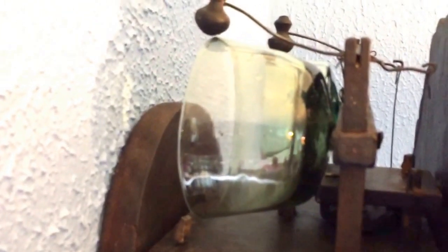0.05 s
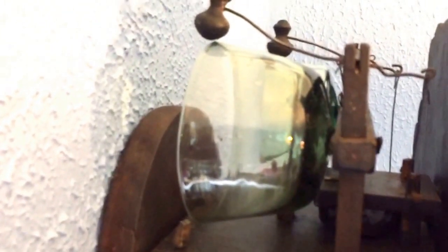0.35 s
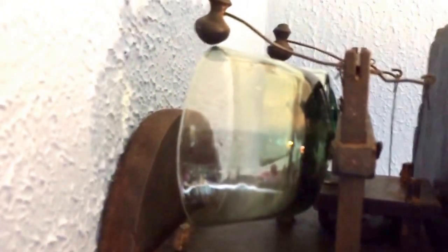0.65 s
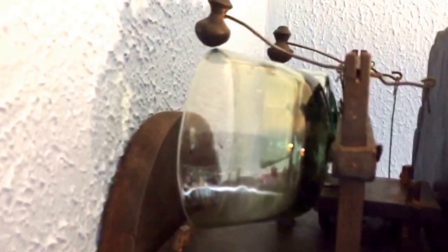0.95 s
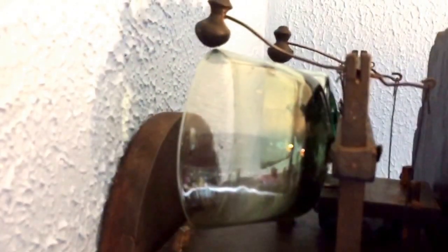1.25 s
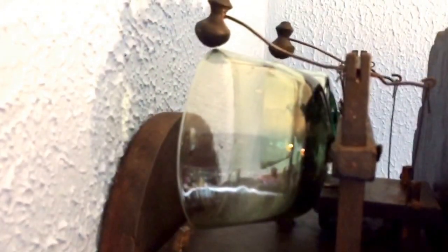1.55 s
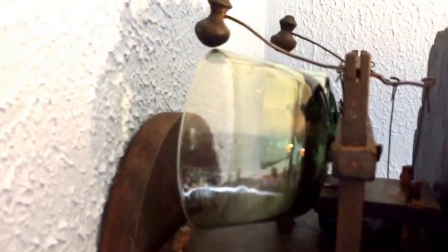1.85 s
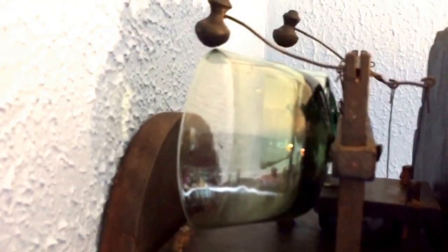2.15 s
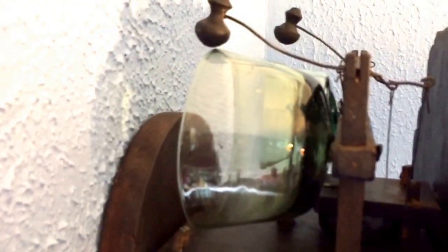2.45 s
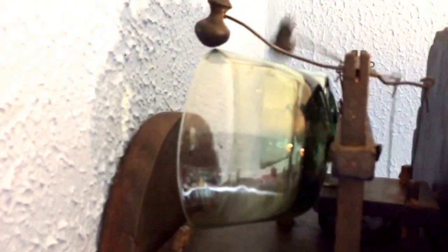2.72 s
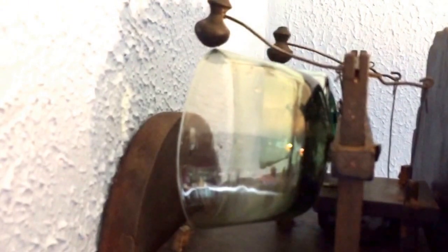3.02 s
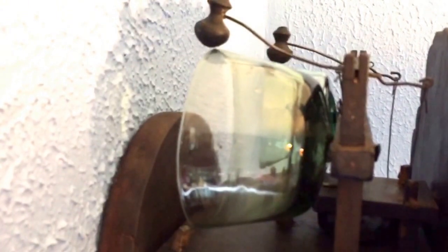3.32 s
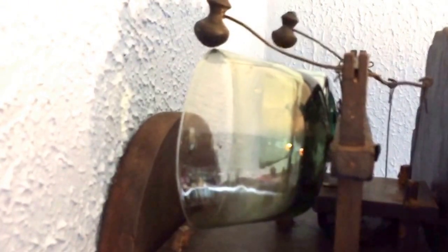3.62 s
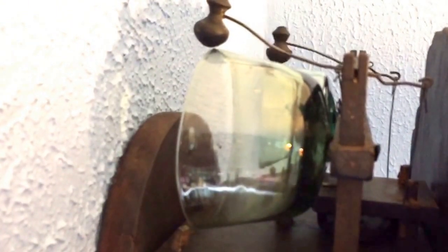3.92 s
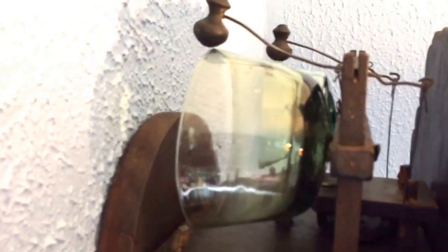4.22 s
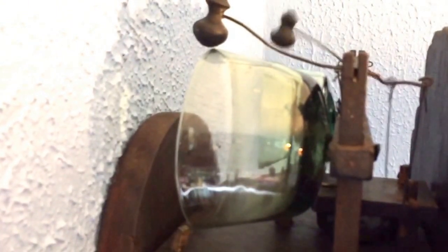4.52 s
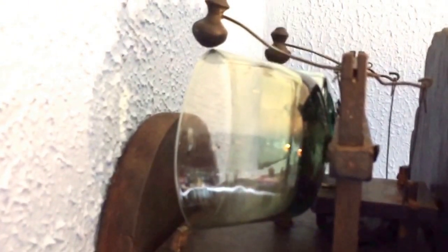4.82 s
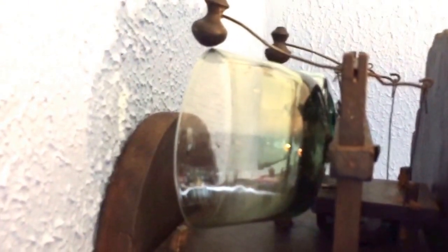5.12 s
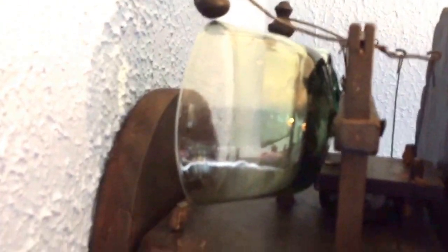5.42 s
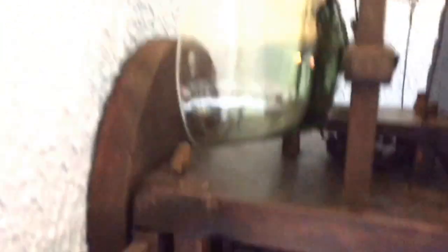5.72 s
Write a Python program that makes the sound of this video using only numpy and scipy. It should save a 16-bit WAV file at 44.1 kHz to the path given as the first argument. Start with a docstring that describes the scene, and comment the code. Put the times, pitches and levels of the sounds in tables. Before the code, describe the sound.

An antique clock's levers click and its gears rattle, then a hammer strikes a glass bell three times, each tone ringing on.

```python
"""Antique clock striking a glass bell

A small room, microphone close to a weight-driven clock. Levers click and release the striking train,
whose gears rattle in the wooden frame while the hammer falls three times on a hand-blown glass bell.
The glass is slightly out of round, so each mode is a close pair that beats; a faint ring lingers from
an earlier blow. At the end the microphone swings away from the glass with a low handling rustle."""
import sys
import numpy as np
from scipy import signal
from scipy.fft import rfft, irfft
from scipy.io import wavfile
from scipy.ndimage import uniform_filter1d

SR = 44100
rng = np.random.default_rng(int(sys.argv[2]) if len(sys.argv) > 2 else 0)


def transcribe(u):
    """Save the signal u as a 16-bit wav file named by the first command-line argument.

    u: samples, shape (n,) or (channels, n), limited to [-1, 1]; the rate is SR.
    q: integer samples, one column per channel.
    """
    v = np.clip(np.atleast_2d(u).T, -1, 1)
    q = np.round(v * 32767).astype(np.int16)
    wavfile.write(sys.argv[1], SR, q)


N = 258623
T = np.arange(N) / SR

# hammer blows: t/s, strength/dB, extra level of the twin modes/dB, factor on the ring time
HAMMER_BLOWS = [(2.8709, 0, .5, .93), (3.9694, -.2, -.5, 1.03), (4.6886, -.3, -1, .9)]
# gear train speeding up, running and slowing down: t/s, rattle/dB, treble scrape/dB
GEAR_RUN = [(1.3, -79, -89), (1.43, -70, -91), (1.67, -88, -96), (1.81, -56, -75), (2.33, -48.5, -71),
            (2.49, -41.5, -58), (2.59, -48, -66), (3.17, -47.5, -59), (3.33, -41.5, -53),
            (3.79, -37.5, -50), (4.08, -42.5, -48.5), (4.51, -36.5, -44), (4.75, -41.5, -47.5),
            (5.12, -37.5, -46), (5.43, -41, -58), (5.58, -41, -72), (5.73, -49, -80), (5.86, -58, -80)]
# levers dropping and bouncing, and one hard pin tick at the end: t/s, clack/dB, tick/dB, ring/dB, centre of the
# ring/Hz
LEVER_DROPS = [(0.317, -60, -53, -35, 4280), (0.325, -53, -49, -40.5, 1840), (0.326, -66, -48, -34, 4270),
               (0.327, -59, -62, -46, 518), (0.817, -70, -86, -48, 1450), (1.201, -69, -72, -44.5, 1830),
               (1.255, -38.5, -45, -40.5, 1880), (1.269, -47, -55, -44, 1090), (1.646, -37, -56, -39, 2800),
               (2.183, -26, -30.5, -14, 2750), (2.192, -26, -28.5, -28, 820), (2.337, -40, -41, -24, 1350),
               (2.353, -33, -45, -25.5, 1850), (2.447, -23.5, -34, -10, 5600),
               (2.461, -35.5, -37, -37, 1110), (2.471, -28, -22.5, -17, 1680), (2.484, -49, -52, -28, 1140),
               (4.942, -24, -28, -9.5, 9700), (5.005, -20, -17, -6.5, 1840), (5.016, -35, -35, -30, 365),
               (5.268, -41, -32, -17.5, 3840)]


def amp(db):
    """Decibels to gain."""
    return 10 ** (np.asarray(db) / 20)


def unit(x):
    """Scales to rms 1."""
    return x / np.sqrt(np.mean(x ** 2) + 1e-20)


def spectrum_db(points, hz):
    """Interpolates a spectrum on a log-frequency axis."""
    f, db = np.transpose(points)
    return np.interp(np.log(hz + 1), np.log(f + 1), db)


def add(mix, s, sound):
    """Mixes a sound in at s seconds."""
    part = mix[max(round(s * SR), 0):][:len(sound)]
    part += sound[:len(part)]


def mode(t, hz, db, t60):
    """A sine that dies by 60 dB in t60 seconds."""
    return amp(db - 60 * t / t60) * np.sin(2 * np.pi * hz * t)


def through_frame(x, lo_hz, hi_hz, size=8192):
    """Passes a force through one band of the frame's response: causal, with unit energy."""
    # broad colour of the clockwork: f/Hz, level/dB
    colour = [(30, -29.5), (60, -7.5), (110, -4.5), (260, -10), (520, -4), (630, -17.5), (830, 2.5),
              (1280, -5.5), (1650, 0), (2700, 2.5), (4500, -1.5), (5500, -6.5), (8000, -14.5),
              (16000, -20.5)]
    # resonances of the frame and its ironwork: f/Hz, width/Hz, lift/dB
    resonances = [(119, 25, 4), (190, 30, 4), (364, 50, 4), (495, 80, 3), (792, 60, 6), (1075, 120, 5),
                  (1690, 130, 4), (1950, 150, 4), (2570, 140, 5), (2900, 150, 3), (4230, 250, 4),
                  (4650, 200, 3), (7400, 300, 3), (8500, 250, 3), (9300, 300, 4), (11450, 700, 6),
                  (14500, 800, 3)]
    hz = abs(np.fft.fftfreq(size, 1 / SR)) + 1
    peaks_db = sum(lift / (1 + (2 * (hz - f) / width) ** 2) for f, width, lift in resonances)
    roll_off = np.sqrt((1 + (lo_hz / hz) ** 8) * (1 + (hz / hi_hz) ** 16))
    gain = amp(spectrum_db(colour, hz) + peaks_db) / roll_off
    log_gain = np.log(np.maximum(gain, 1e-5))
    minimum_phase = np.exp(np.conj(signal.hilbert(log_gain)))
    taps = np.fft.ifft(minimum_phase).real[:size // 2]
    return signal.oaconvolve(x, taps / np.linalg.norm(taps))[:N]


def bursts(times, levels_db, rise_s, t60):
    """Each contact swells as the parts seat, then scatters into quickly dying reflections."""
    power, t = np.zeros(N), T[:SR // 3]
    swell = np.minimum(t / rise_s, 1)
    fall_db = 60 * np.maximum(t - rise_s, 0) / t60
    for s, db in zip(times, levels_db):
        add(power, s, (swell * amp(db - fall_db)) ** 2)
    return np.sqrt(power) * rng.standard_normal(N)


def chatter(per_s, spread_db, t60):
    """Parts catching unevenly: many small bursts of random size, steady on average."""
    sizes = amp(spread_db * np.minimum(rng.exponential(1, N), 3))
    catches = sizes * (rng.random(N) < per_s / SR)
    power = signal.lfilter([1], [1, -amp(-120 / (t60 * SR))], catches ** 2)
    local_mean = abs(uniform_filter1d(power, size=6000)) + 1e-9
    return np.sqrt(power / local_mean) * rng.standard_normal(N)


def click(s, clack_db, tick_db, rise_s, clack_t60, tick_t60):
    """Iron on iron: a clack through the frame and a short bright tick."""
    clack = through_frame(bursts(s, clack_db, rise_s, clack_t60), 640, 4900)
    return clack + through_frame(bursts(s, tick_db, rise_s, tick_t60), 4800, 26000)


def room_tone(level_db=-64.5):
    """Low steady noise of the room."""
    # spectrum of the room: f/Hz, relative level/dB
    colour = [(15, -40), (30, -4.5), (60, -0.5), (130, -1.5), (220, -20.5), (300, -8.5), (400, -21.5),
              (1200, -22), (3000, -30), (9000, -35), (16000, -47)]
    gain = amp(spectrum_db(colour, np.fft.rfftfreq(N, 1 / SR)))
    return amp(level_db) * unit(irfft(rfft(rng.standard_normal(N)) * gain, N))


def walls(x, wet_db=-16, t60=0.17, dull_hz=4000, delay_s=0.004):
    """Adds a short, dull tail from the plaster walls."""
    t = T[:SR // 2]
    tail = rng.standard_normal(len(t)) * amp(-60 * t / t60) * (t > delay_s)
    tail = signal.sosfilt(signal.butter(1, dull_hz, fs=SR, output="sos"), tail)
    return x + amp(wet_db) * signal.oaconvolve(x, tail / np.linalg.norm(tail))[:N]


def handling(start_s=4.95, rise_s=0.077, level_db=-52.5, band_hz=(45, 550)):
    """A low rustle as the hand starts to move the microphone and keeps it moving."""
    band = signal.butter(3, band_hz, "bandpass", fs=SR, output="sos")
    rustle = unit(signal.sosfilt(band, rng.standard_normal(N)))
    return amp(level_db) * np.clip((T - start_s) / rise_s, 0, 1) * rustle


def bumps(rise_s=0.0077, side_ratios=(0.55, 1.1), side_db=-8):
    """A soft push wakes three well-damped low modes."""
    # dull bumps from the case and from handling: t/s, f/Hz, level/dB, t60/s
    pushes = [(0.225, 102, -52, 0.53), (0.333, 162, -52, 0.56), (0.701, 335, -33.5, 0.037),
              (0.986, 277, -52, 0.052), (1.136, 324, -39, 0.033), (1.215, 380, -47.5, 0.068),
              (5.673, 84, -35.5, 0.099)]
    out, t = np.zeros(N), T[:SR // 4]
    for s, hz, db, t60 in pushes:
        body = mode(t, hz, 0, t60) + sum(mode(t, hz * ratio, side_db, t60) for ratio in side_ratios)
        add(out, s, amp(db) * np.minimum(t / rise_s, 1) * body)
    return out


def gears(full_run_db=-40, rumble_db=-50.5, rumble_follows=0.51, rattle_db=1, scrape_db=4, whirr_db=-10):
    """Catching teeth and a smooth whirr shake the frame; the dry pivots add a grainy scrape."""
    s, *columns = np.transpose(GEAR_RUN)
    run_db, friction_db = (np.interp(T, s, db, left=-120) for db in columns)
    drive_db = run_db - full_run_db
    speed = np.minimum(amp(drive_db), 1)
    teeth = chatter(per_s=70 + 100 * speed, spread_db=1.0, t60=0.024)
    whirr = rng.standard_normal(N)
    pivots = chatter(per_s=190, spread_db=4.5, t60=0.03)
    rumble = through_frame(amp(rumble_db + rumble_follows * drive_db) * unit(teeth + whirr), 68, 750)
    rattle = through_frame(amp(run_db + rattle_db) * (teeth + amp(whirr_db) * whirr), 838, 5200)
    scrape = through_frame(amp(friction_db + scrape_db) * pivots, 4390, 24000)
    return rumble + rattle + scrape


def wheel_clinks(per_mode_per_s=14, lift_db=0.5, spread_db=3.5, ring_cycles=90, detune=0.035):
    """Stray teeth catch hard and ring a wheel, louder as the train runs harder."""
    # modes of the wheels: f/Hz, relative level/dB
    wheel_modes = [(1950, -12), (2570, 1), (2900, 6), (4090, -1), (4500, 1.5), (7400, -9), (11450, -16)]
    s, rattle_db, _ = np.transpose(GEAR_RUN)
    out = np.zeros(N)
    for hz, db in wheel_modes:
        for when, softness, pitch in rng.random((round(per_mode_per_s * T[-1]), 3)):
            start_s = when * T[-1]
            clink_hz = hz * (1 + detune * (2 * pitch - 1))
            run_db = np.interp(start_s, s, rattle_db, left=-120)
            peak_db = run_db + lift_db + db - spread_db * np.log(softness + 0.046)
            add(out, start_s, mode(T[:SR // 10], clink_hz, peak_db, ring_cycles / clink_hz))
    return out


def ratchet(clack_db=-3, tick_db=-16, thump_db=-17):
    """The pawl slips over the ratchet in light, dry clicks, all of one colour."""
    # slips as the train starts: t/s, level/dB
    slips = [(1.394, -35), (1.4356, -35.5), (1.479, -36.5), (1.5346, -37.5), (1.5808, -47), (1.6203, -48),
             (1.6628, -27), (1.6863, -32), (1.719, -35.5), (1.7504, -35.5), (1.775, -43), (1.8023, -40.5),
             (1.831, -36), (1.8833, -41), (1.9056, -38.5), (1.9781, -34.5), (2.0165, -35.5),
             (2.0385, -36.5), (2.0995, -32.5), (2.253, -31.5), (2.4104, -32.5)]
    s, db = np.transpose(slips)
    thump = through_frame(bursts(s, db + thump_db, rise_s=0.002, t60=0.15), 170, 1110)
    return thump + click(s, db + clack_db, db + tick_db, rise_s=0.002, clack_t60=0.04, tick_t60=0.038)


def pins(clack_db=-10, clack_follows=0.54, tick_db=3):
    """Pins of the running train tick against the hammer tail; the harder, the brighter."""
    # pins catching: t/s, level/dB
    catches = [(2.7014, -46.5), (2.721, -45), (2.8086, -42), (3.1397, -46.5), (3.1834, -38), (3.4535, -40),
               (3.6322, -34), (3.6484, -36), (4.2802, -31), (4.2988, -32), (5.1104, -30), (5.394, -31),
               (5.4573, -43.5), (5.5706, -35)]
    s, db = np.transpose(catches)
    return click(s, clack_db + clack_follows * db, db + tick_db,
                 rise_s=0.00033, clack_t60=0.042, tick_t60=0.028)


def levers(clack_db=1.5, tick_db=2.5, thump_db=-21, thump_follows=0.72, boom_db=-7):
    """A falling lever clicks and thumps the frame, which booms on; harder drops thump more."""
    s, clack, tick, _, _ = np.transpose(LEVER_DROPS)
    push_db = thump_db + thump_follows * clack
    thump = bursts(s, push_db, rise_s=0.00067, t60=0.21)
    boom = bursts(s, push_db + boom_db, rise_s=0.0047, t60=0.37)
    clicks = click(s, clack + clack_db, tick + tick_db, rise_s=0.0027, clack_t60=0.06, tick_t60=0.027)
    return through_frame(thump + boom, 59, 784) + clicks


def lever_rings(ring_cycles=79, fall_db_per_octave=22, rise_s=0.0017):
    """Each drop rings the iron's modes, most of all those near one pitch set by where it lands."""
    # modes of the lever iron: f/Hz, relative level/dB
    iron_modes = [(365, -1), (518, -5), (795, -4.5), (1090, 2), (1250, -3.5), (1696, 0.5), (1930, 2),
                  (2570, -3.5), (2900, -7), (4280, 3.5), (5520, 2.5), (9700, -3.5)]
    out, t = np.zeros(N), T[:SR // 3]
    for s, _, _, ring_db, centre_hz in LEVER_DROPS:
        ring = sum(mode(t, hz, db - fall_db_per_octave * abs(np.log2(hz / centre_hz)), ring_cycles / hz)
                   for hz, db in iron_modes)
        add(out, s, amp(ring_db) * np.minimum(t / rise_s, 1) * ring)
    return out


def hammer(thump_db=-29, crack_db=-24.5, tick_db=-22, rise_s=0.00011):
    """The blow cracks on the glass and jolts the frame."""
    s, strength_db, _, _ = np.transpose(HAMMER_BLOWS)
    thump = through_frame(bursts(s, strength_db + thump_db, rise_s, t60=0.015), 90, 680)
    crack = through_frame(bursts(s, strength_db + crack_db, rise_s, t60=0.032), 580, 6980)
    tick = through_frame(bursts(s, strength_db + tick_db, rise_s, t60=0.037), 5000, 18000)
    return thump + crack + tick


def glass_bell(lingering_db=-62.5, lingering_t60=3.3):
    """Over a faint lingering ring, each blow stops the last and starts the beating pairs afresh."""
    # mode pairs of the glass: f/Hz, twin f/Hz
    pitches = [(1373.1, 1363.3), (3207.4, 3182), (5831.5, 5827.6), (9180, 9168), (13180, 13172),
               (14850, 14820), (15590, 15560)]
    # ring of each pair: level/dB, t60/s, relative twin/dB, twin t60/s, relative attack/dB, attack t60/s
    decays = [(-36.5, 20.2, -3.5, 9.6, -4, 0.66), (-16.5, 1.902, -19.5, 1.95, -6, 0.34),
              (-18, 0.33, 1, 0.33, -9.5, 0.017), (-16.5, 0.12, -6.5, 0.14, -17, 0.015),
              (-33, 0.15, -7, .15, -19.5, 0.022), (-44, 0.068, -8.5, .09, -15.5, .02),
              (-51, .09, -7.5, .09, -11, 0.018)]
    # hammer wire and frame, ringing briefly at each blow: f/Hz, level/dB, t60/s
    clang_modes = [(4070, -38.5, .05), (6740, -37, 0.07), (9620, -47.5, .08), (11700, -42, 0.054),
                   (12240, -41, 0.04)]
    out = mode(T, pitches[0][0], lingering_db, lingering_t60)
    ends = [blow[0] for blow in HAMMER_BLOWS[1:]] + [T[-1] + 1]
    for (s, strength_db, lean_db, sustain), end in zip(HAMMER_BLOWS, ends):
        t = T[:round((end - s) * SR)]
        ring = sum(mode(t, hz, db, t60) for hz, db, t60 in clang_modes)
        for (hz, twin_hz), (db, t60, twin_db, twin_t60, attack_db, attack_t60) in zip(pitches, decays):
            # where the hammer lands sets the twin's share, and so the depth of the beat
            twin = mode(t, twin_hz, twin_db + lean_db, twin_t60 * sustain)
            pair = mode(t, hz, 0, t60 * sustain) + twin
            # the first wide swing dies faster than the rest
            ring += amp(db) * pair * (1 + amp(attack_db - 60 * t / attack_t60))
        onset = np.clip(t / 0.0004, 0, 1)
        stop = np.clip((t[-1] - t) / 0.001, 0, 1)
        add(out, s, amp(strength_db) * onset * stop * ring)
    return out


def scene():
    """Mono, close up: bell and lever rings dry, the clockwork with a little of the walls."""
    # the microphone swings away from the glass at the end: t/s, bell gain/dB
    swing = [(5.0, 5), (5.45, 5.5), (5.86, 1.5)]
    nearness = amp(np.interp(T, *np.transpose(swing)))
    works = hammer() + levers() + ratchet() + pins() + gears() + wheel_clinks() + bumps()
    return (nearness * glass_bell() + lever_rings() + walls(works) + handling() + room_tone())[None]


def record(dry, low_cut_hz=42, high_cut_hz=16000, knee=0.66, ceiling=0.672):
    """A small microphone loses the deep bass, rounds off the loudest peaks and cuts the top treble."""
    x = signal.sosfilt(signal.butter(2, low_cut_hz, "highpass", fs=SR, output="sos"), dry)
    headroom = ceiling - knee
    excess = np.maximum(abs(x) - knee, 0)
    rounded = np.clip(x, -knee, knee) + np.sign(x) * headroom * np.tanh(excess / headroom)
    lowpass = signal.firwin(255, high_cut_hz, window=("kaiser", 9), fs=SR)
    return signal.oaconvolve(rounded, lowpass[None], "same")


dry = scene()
out = record(dry)
transcribe(out)
```